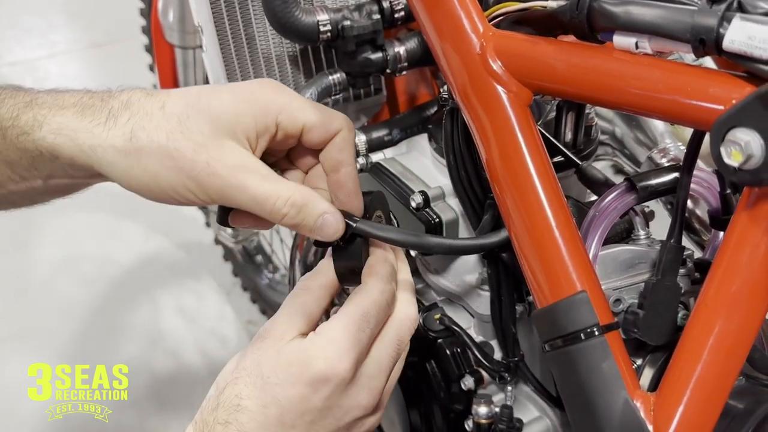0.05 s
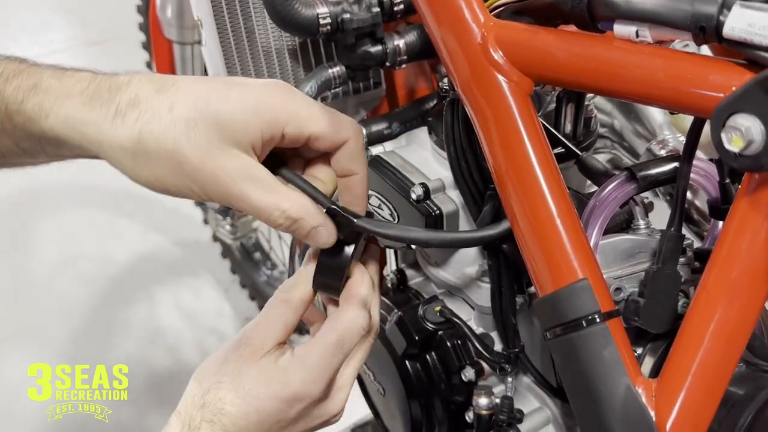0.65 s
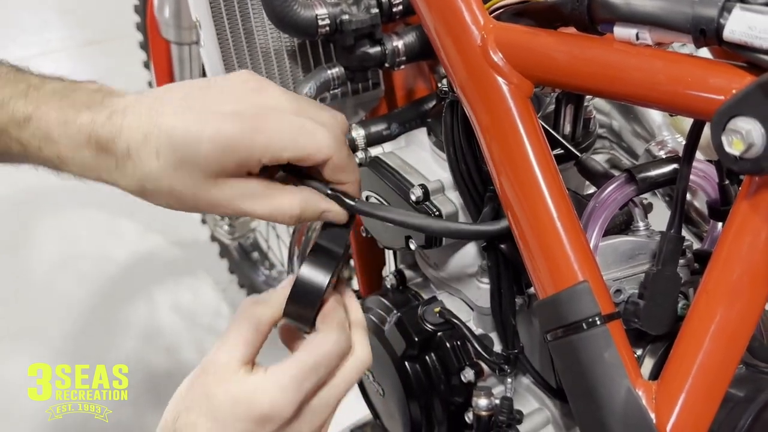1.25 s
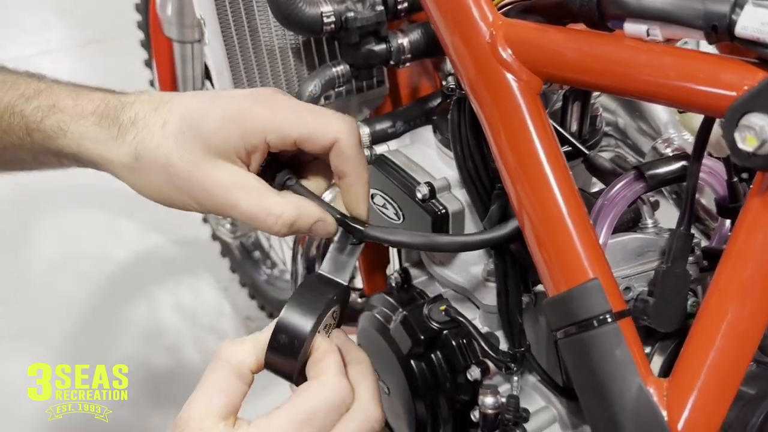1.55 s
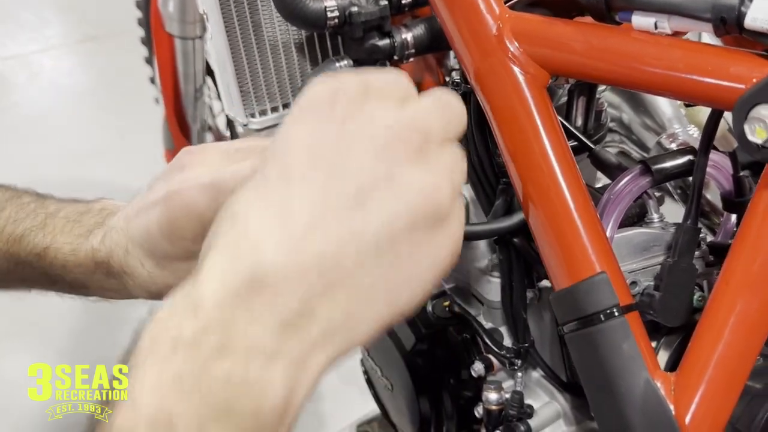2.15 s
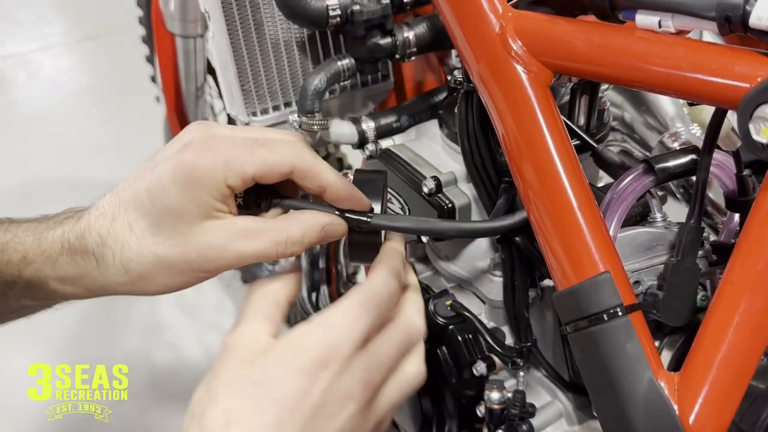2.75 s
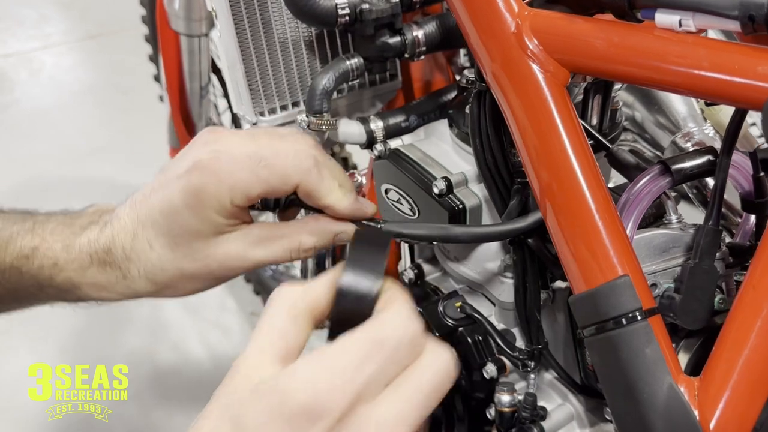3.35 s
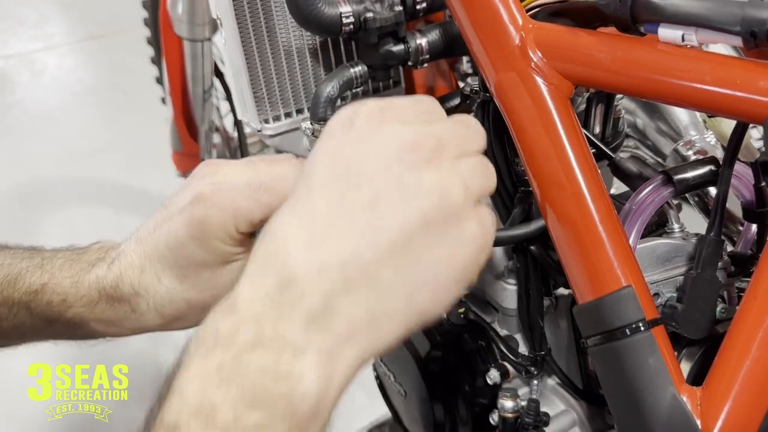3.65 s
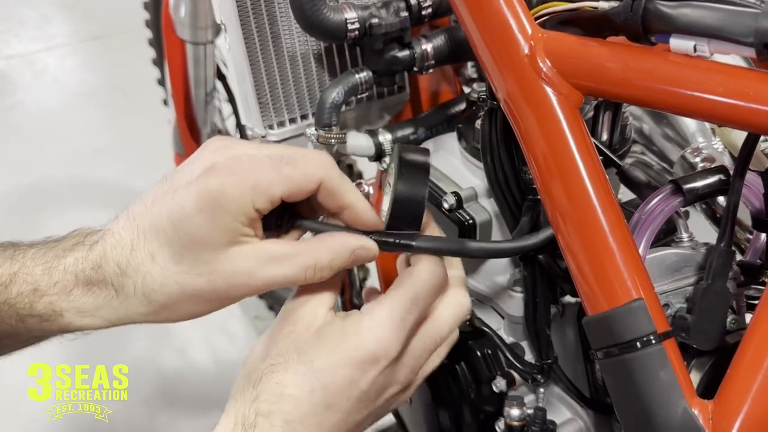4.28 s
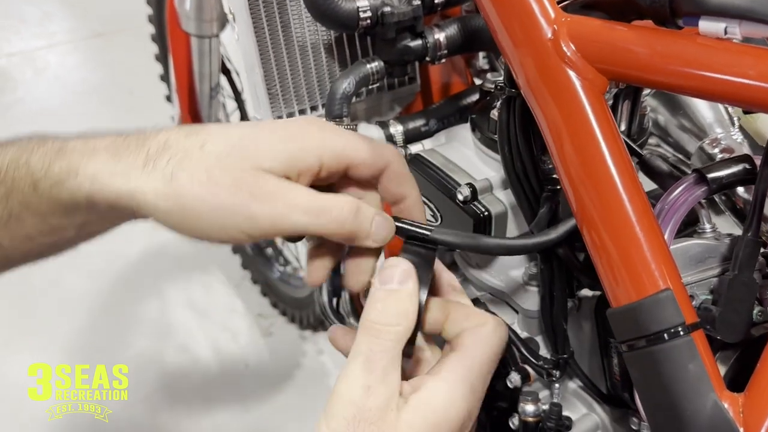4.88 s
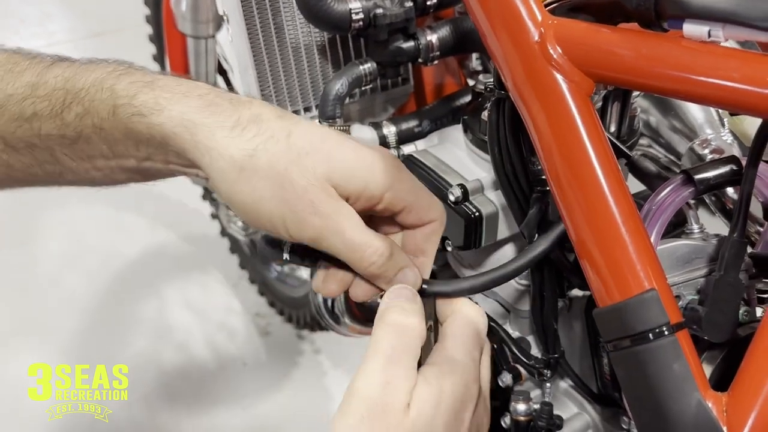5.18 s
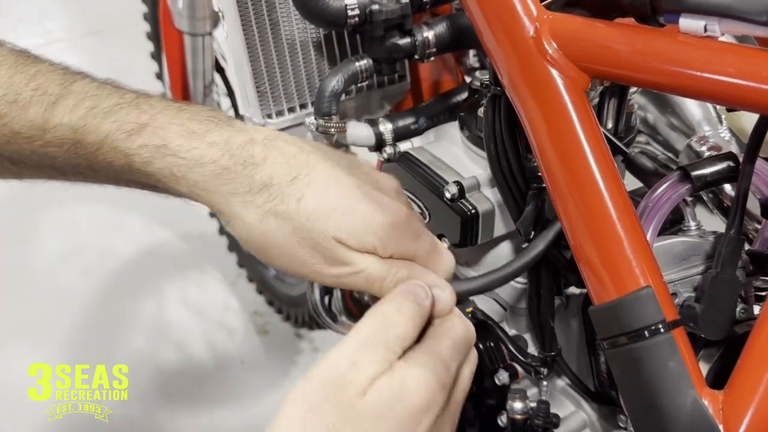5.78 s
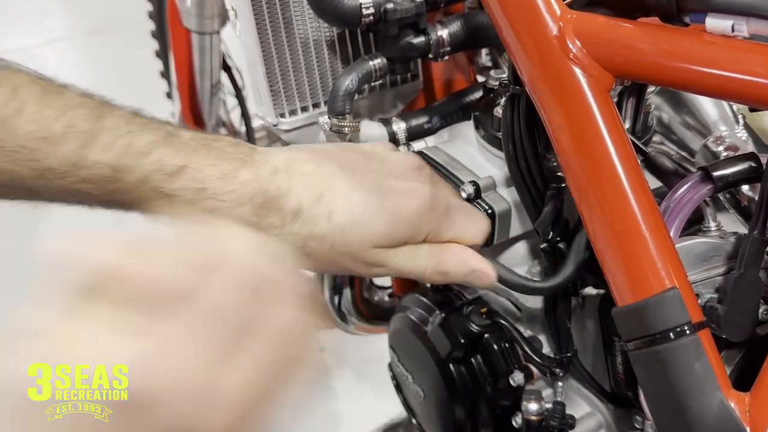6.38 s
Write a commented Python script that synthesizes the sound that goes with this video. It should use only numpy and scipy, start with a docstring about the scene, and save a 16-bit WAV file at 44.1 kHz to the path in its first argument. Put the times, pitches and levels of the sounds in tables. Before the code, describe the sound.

A quiet workshop is heard throughout, with faint low rumble, ventilation and a hum that slowly grows. Close to the microphone, vinyl electrical tape is wound by hand around a cable. It peels off the roll in short, soft rasps around 0.5 seconds, most clearly at 1.3, and again between 3.5 and 4.1 seconds. Small sticky ticks are scattered irregularly all along, mixed with faint finger rubs and hollow rustles of the roll. Fingers swish lightly over the tape at about 3 and 5.2 seconds. From 5 seconds the tape stretches with little runs of ticks. At about 6.3 seconds it nicks, then tears at 6.4 with one sharp crack, by far the loudest sound. A short room echo and a faint metallic ring from the motorcycle follow, with one last small click near 6.6 seconds.

```python
"""Taping a motorcycle cable

A quiet workshop, one microphone close to the hands. Vinyl electrical tape peels off its roll
with a soft hiss and sticky ticks as it is wound round a cable, and fingers rub and slide over it.
At the end it is pulled taut, nicks, and tears with one sharp crack that leaves the bike ringing.
Behind it all lie the building's rumble, the ventilation and a slowly growing hum."""
import sys
import numpy as np
from scipy import signal
from scipy.fft import rfft, irfft, next_fast_len
from scipy.io import wavfile
from scipy.ndimage import map_coordinates

SR = 44100
rng = np.random.default_rng(int(sys.argv[2]) if len(sys.argv) > 2 else 0)


def wav_out(sig):
    """Save sig, one row per channel (or a flat mono array), as 16-bit PCM at SR to the path in sys.argv[1]."""
    wavfile.write(sys.argv[1], SR, np.round(np.clip(np.atleast_2d(sig).T, -1, 1) * 32767).astype(np.int16))


N = 292383

# The hollow body of the roll, knocked or rustled. Each row: frequency in Hz, level in dB.
ROLL_COLOUR = [(100, -27.5), (300, 1), (500, -2), (800, -3.5), (1000, -11.5), (1150, 2), (1400, -15),
               (3000, -24.5)]


def amp(db):
    """Decibels to gain."""
    return 10 ** (np.asarray(db) / 20)


def unit(x):
    """Scale to rms 1."""
    return x / np.sqrt(np.mean(x ** 2) + 1e-20)


def unit_burst(x):
    """Scale a burst to the energy of 10 ms at rms 1."""
    return x * np.sqrt(SR / 100 / np.sum(x ** 2))


def along(points, hz):
    """Read (Hz, value) points on a log frequency axis."""
    point_hz, values = np.transpose(points)
    return np.interp(np.log(hz + 1), np.log(point_hz + 1), values)


def wobble(rate):
    """A smooth random curve, rate knots a second."""
    knots = rng.standard_normal(int(N * rate / SR) + 4)
    return map_coordinates(knots, [np.arange(N) * rate / SR])


def swell(t, length):
    """One smooth rise and fall around t = 0."""
    return np.exp(-(2 * t / length) ** 2)


def add(track, s, x):
    """Mix x into the track at s seconds."""
    start = round(s * SR)
    x = x[max(-start, 0):]
    part = track[max(start, 0):][:len(x)]
    part += x[:len(part)]


def coloured(x, colour, size=4096):
    """Pass x through a minimum-phase filter with the given (Hz, dB) shape."""
    gain = amp(along(colour, np.fft.rfftfreq(size, 1 / SR)))
    cepstrum = irfft(np.log(gain))
    kernel = irfft(np.exp(rfft(2 * cepstrum[:size // 2], size) - cepstrum[0]))
    return signal.fftconvolve(x, kernel)[:len(x)]


def dying_noise(decay, t60_scale=1, size=16384):
    """Noise in which each frequency dies at its own speed."""
    hz, t, spectra = signal.stft(rng.standard_normal(size), SR, nperseg=128)
    t60 = t60_scale * along(decay, hz)[:, None]
    return signal.istft(spectra * amp(-60 * t / t60), SR)[1]


def burst(colour, t60, edge=0.89, size=4096):
    """A sharp release followed by a short crinkle."""
    t = np.arange(size) / SR
    crinkle = rng.standard_normal(size) * amp(-60 * t / t60)
    release = 1 + edge * np.exp(-t / 0.00026)
    return unit_burst(coloured(crinkle * release, colour))


def crackle(colour, rate, spread_db, hiss, size=N):
    """Tiny random releases, rate a second, over a smooth friction hiss."""
    grains = (rng.random(size) < rate / SR) * rng.standard_normal(size)
    grains *= amp(spread_db * rng.standard_normal(size))
    return unit(coloured(unit(grains) + hiss * rng.standard_normal(size), colour))


def ring(modes, attack_s):
    """Damped modes that swell over the attack time; neighbours swing in opposite senses."""
    t = np.arange(SR // 2) / SR
    swings = [(-1) ** k * amp(db - 60 * t / t60) * np.sin(2 * np.pi * hz * t)
              for k, (hz, db, t60) in enumerate(modes)]
    return sum(swings) * (1 - np.exp(-t / attack_s))


def peeling(rise_share=0.42, edge_drop_db=8.5):
    """Glue threads let go in a fine, fluttering rasp as each pull speeds up and eases off."""
    # Tape drawn off the roll. Each row: peak time in seconds, length in seconds, level in dB.
    pulls = [(0.375, 0.18, -68.5), (0.59, 0.33, -69), (1.347, 0.18, -54.5), (1.478, 0.27, -64.5),
             (2.138, 0.075, -63.5), (3.548, 0.073, -58.5), (3.715, 0.11, -61), (4.106, 0.11, -65),
             (4.83, 0.22, -71)]
    # The rasp of unrolling. Each row: frequency in Hz, level in dB.
    rasp_colour = [(900, -8.5), (2200, -7.5), (2750, -2), (3300, 3), (3800, 0.5), (4450, -8.5), (5000, -2),
                   (5550, -7), (6150, 4), (6750, -5), (7350, 1), (9000, -11.5), (10100, -9.5), (12000, -19),
                   (16000, -30)]
    t = np.arange(N) / SR
    pull = np.zeros(N)
    for peak, length, db in pulls:
        from_peak = np.maximum((peak - t) / rise_share, (t - peak) / (1 - rise_share)) / length
        pull += amp(db - edge_drop_db * from_peak)
    flutter = amp(0.45 * wobble(39.55))
    return pull * flutter * crackle(rasp_colour, rate=4400, spread_db=4.5, hiss=1.07)


def tick(s, film_share, winding_hz=7310, stretch_from_s=5.23, sag_hz_per_s=780):
    """A patch of glue pops free and the film flexes; broad creases and stretched tape sound lower."""
    # Glue popping and film flexing. Each row: multiple of the tick's pitch, level in dB.
    glue_colour = [(.25, -49), (.48, -7), (.7, -9), (.88, -4.5), (1.02, 2.5), (1.2, -7), (1.6, -14),
                   (2.3, -33)]
    film_colour = [(.1, -29), (.22, -5), (.29, -6), (.36, -7), (.43, -6), (.52, -9.5), (.68, -13),
                   (1.1, -34)]
    hz = winding_hz - sag_hz_per_s * max(s - stretch_from_s, 0)
    hz *= 1 - 0.2 * film_share ** 2  # a crease lies up to 20% under a pure pop
    hz *= 1 + 0.012 * rng.standard_normal()
    pop = burst([(ratio * hz, db) for ratio, db in glue_colour], t60=0.016)
    film = burst([(ratio * hz, db) for ratio, db in film_colour], t60=0.027)
    return np.sqrt(film_share) * film + np.sqrt(1 - film_share) * pop


def sticky_ticks(average_knock_db=-61):
    """Each clear tick also knocks the roll softly, louder ticks a little harder."""
    # Each row: start in seconds, level in dB, film share from 0 (glue pop) to 1 (film crease).
    ticks = [(0.3447, -53.5, 0.23), (0.8696, -58, 0.7), (0.88, -48, 0.9), (0.908, -60, 0.16),
             (1.313, -54.5, 0.14), (1.401, -61, .08), (1.976, -62, 0.4), (2.061, -58.5, 0),
             (2.357, -62.5, 0.1), (2.391, -62, 0.1), (2.629, -56, 0.5), (2.677, -51.5, 0.03),
             (2.887, -58.5, .9), (3.0906, -47.5, 0.17), (3.138, -60, 0.05), (3.436, -57, 0.14),
             (3.46, -56, .06), (3.5577, -54, 0), (3.66, -45, 0.02), (3.989, -55, 0.02),
             (4.198, -50.5, 0.02), (4.3398, -47.5, .03), (4.4064, -53, 0.02), (4.467, -55, .05),
             (4.787, -48, 0.01), (5.1845, -56, 0.4), (5.258, -53.5, 0.2), (5.371, -46.5, 0.63),
             (5.424, -48.5, 0.27), (5.5767, -49.5, 0.48), (5.6163, -49.5, 0.4), (6.049, -55, 0.72),
             (6.1006, -52, 0.42), (6.5917, -38, 0)]
    out = np.zeros(N)
    average_db = np.mean([db for _, db, _ in ticks])
    for s, db, film_share in ticks:
        knock = amp(average_knock_db + 0.5 * (db - average_db)) * burst(ROLL_COLOUR, t60=0.042)
        add(out, s, amp(db) * tick(s, film_share) + knock)
    return out


def straining(ticks_per_s=32, spread_db=1.5):
    """Strained glue gives way in small, unevenly spaced steps."""
    # Runs of faint ticks. Each row: start in seconds, length in seconds, level in dB.
    strains = [(0.999, 0.15, -66.5), (2.309, .18, -65), (5.152, .22, -61.5), (5.591, .14, -63.5),
               (6.018, .28, -66)]
    out = np.zeros(N)
    for start, length, db in strains:
        for step in range(round(length * ticks_per_s)):
            s = start + (step + rng.random()) / ticks_per_s
            add(out, s, amp(db + spread_db * rng.standard_normal()) * tick(s, film_share=0.5))
    return out


def tear():
    """The taut tape nicks, the roll bumps, the tape parts; the recoil jolts the roll and rings the bike."""
    # Nick, bump and crack. Each row: start in seconds, level in dB, t60 scale, echo level in dB.
    stages = [(6.3424, -23.5, 1, -38.5), (6.3995, -33, 1, -41.5), (6.437, -14, 0.78, -28.5)]
    # Their colours, and that of the crack's echo. Each row: frequency in Hz, level in dB.
    nick = [(40, -12), (80, 0), (120, -5), (180, -13), (320, 1.5), (600, -14.5), (850, -3.5), (1580, -10),
            (2410, 1.5), (3100, -1.5), (4800, -1), (7000, 0), (10000, -3), (16000, -20)]
    bump = [(150, -27), (400, 3.5), (650, 6), (1150, -3), (1600, -14), (5000, -42)]
    crack = [(80, -29), (250, -24), (390, -12.5), (800, -8), (1220, -4.5), (1600, -8), (2200, -3),
             (2900, -4.5), (4900, -7), (6900, -18), (8050, -8.5), (9000, -16), (12300, -18.5), (16000, -37)]
    crack_echo = [(100, -21), (400, 2), (900, 6), (1250, 2.5), (1650, -2), (2200, 1.5), (3200, -1.5),
                  (5000, -7), (8000, -14.5), (15000, -26)]
    # How fast a snap dies. Each row: frequency in Hz, t60 in seconds before scaling.
    damping = [(120, 0.17), (500, 0.079), (1200, 0.032), (3000, 0.03), (8000, 0.023), (15000, 0.015)]
    # Roll with cable, and the bike's metal. Each row: frequency in Hz, level in dB, t60 in seconds.
    roll_modes = [(406, -24, 0.092), (657, -27.5, 0.071), (778, -24.5, 0.098), (996, -20, 0.066),
                  (1182, -9, 0.029), (1280, -10.5, 0.039), (2190, -19, 0.032), (2606, -16.5, 0.047),
                  (2750, -13, 0.022), (3010, -20, 0.059), (4400, -32, 0.043), (5960, -17.5, 0.023),
                  (8000, -26, 0.022)]
    metal_modes = [(241.7, -49.5, 1), (413, -44.5, 0.78), (551, -33.5, 0.55), (592, -31.5, 0.55),
                   (633, -45, .55)]
    out = np.zeros(N)
    direct, returned = (nick, bump, crack), (nick, bump, crack_echo)
    for (s, db, t60_scale, echo_db), colour, echo_colour in zip(stages, direct, returned):
        snap = coloured(dying_noise(damping, t60_scale), colour)
        add(out, s, amp(db) * unit_burst(snap))
        add(out, s, amp(echo_db) * unit_burst(echo(echo_colour)))
    parting_s = stages[-1][0]
    add(out, parting_s, ring(roll_modes, attack_s=0.0012) + ring(metal_modes, attack_s=0.0073))
    return out


def finger_slides(catch_db=3):
    """Skin on vinyl: a catching swish whose pitch follows the finger."""
    # Each row: start and length in seconds, first and last pitch in Hz, half-width in Hz, level in dB.
    slides = [(2.914, 0.058, 4220, 6400, 800, -64.5), (3.14, 0.2, 6200, 2390, 452, -63.5),
              (5.071, 0.16, 8070, 7700, 700, -64.5), (5.211, 0.18, 6600, 6400, 260, -55)]
    out = np.zeros(N)
    for s, length, start_hz, end_hz, half_width_hz, db in slides:
        n = int(length * SR)
        phase = 2 * np.pi * np.cumsum(np.geomspace(start_hz, end_hz, n)) / SR
        lowpass = signal.butter(2, half_width_hz, fs=SR, output="sos")
        noise = signal.sosfilt(lowpass, rng.standard_normal((2, SR // 2)))[:, :n]
        gliding_band = noise[0] * np.sin(phase) + noise[1] * np.cos(phase)
        swish = unit(gliding_band * amp(catch_db * wobble(65)[:n]))
        add(out, s, amp(db) * swish * np.sin(np.linspace(0, np.pi, n)))
    return out


def rub(octaves, hollow_db=3, bands=40):
    """One second of rubbing hiss, shifted in pitch; cupped hands form new resonances every time."""
    # Skin rubbing on tape. Each row: frequency in Hz before the shift, level in dB.
    rub_colour = [(1000, -18), (2000, -13.5), (3400, -0.5), (4500, -2.5), (6200, 1.5), (7600, 3),
                  (9000, -2), (12000, -8.5), (16000, -20)]
    hz = np.geomspace(1000, 16000, bands)
    shape_db = along(rub_colour, hz / 2 ** octaves) + hollow_db * rng.standard_normal(bands)
    return crackle(np.column_stack([hz, shape_db]), rate=3000, spread_db=6, hiss=1.16, size=SR)


def rubbing(plain_stroke_db=-67.5, octaves_per_db=0.03):
    """Each stroke swells and fades, brighter when brisker; a grip is a dull rub that rustles the roll."""
    # Smoothing the tape and regripping the roll. Each row: middle and length in seconds, level in dB.
    strokes = [(0.928, .17, -66.5), (2.449, 0.067, -67), (2.67, .09, -66.5), (3.05, 0.14, -66),
               (3.241, 0.25, -65.5), (3.412, 0.11, -68), (3.84, 0.067, -61.5), (4.601, 0.21, -61.5),
               (5.311, 0.14, -59.5), (5.741, 0.07, -68), (5.95, 0.11, -67.5)]
    grips = [(0.37, 0.055, -62), (1.056, .18, -66.5), (1.34, 0.081, -65), (2.053, 0.029, -56.5),
             (2.356, 0.034, -68), (3.111, 0.051, -65), (4.488, 0.033, -60), (5.637, 0.057, -59.5),
             (5.9, 0.15, -64)]
    out = np.zeros(N)
    t = np.arange(SR) / SR - 0.5
    for middle, length, db in strokes:
        skin = rub(octaves=octaves_per_db * (db - plain_stroke_db))
        add(out, middle - 0.5, amp(db) * swell(t, length) * skin)
    for middle, length, db in grips:
        rustle = crackle(ROLL_COLOUR, rate=450, spread_db=2, hiss=2.1, size=SR)
        skin = amp(-7) * rub(octaves=-0.68)
        add(out, middle - 0.5, amp(db) * swell(t, length) * (rustle + skin))
    return out * amp(2.5 * wobble(45))


def echo(colour, build_s=0.0023):
    """The workshop's diffuse answer to a snap builds up, then dies away."""
    # The room's decay. Each row: frequency in Hz, t60 in seconds.
    room_decay = [(150, 0.6), (600, 0.6), (2500, 0.57), (6000, 0.5), (10000, 0.27), (16000, 0.1)]
    tail = coloured(dying_noise(room_decay), colour)
    t = np.arange(len(tail)) / SR
    return tail * (1 - np.exp(-t / build_s))


def room(x, wet_db):
    """The small sounds as the walls return them."""
    # The colour of the reflections. Each row: frequency in Hz, level in dB.
    wall_colour = [(100, -1), (600, 5.5), (1300, -1.5), (2500, -6.5), (6000, -10.5), (15000, 2)]
    tail = echo(wall_colour)
    return amp(wet_db) * signal.fftconvolve(x, tail / np.linalg.norm(tail))[:N]


def background(hum_hz=92.6, whine_hz=1529, whine_db=-82, rumble_db=-64):
    """Room tone: building rumble and ventilation, with a wavering hum and a faint whine."""
    # The rising room tone. Each row: time in seconds, ventilation level in dB, hum level in dB.
    levels = [(0, -67, -84), (3.0, -65.5, -74), (5.0, -62, -65), (6.3, -61.5, -60.5)]
    # The building and its ventilation. Each row: frequency in Hz, level in dB.
    rumble_colour = [(15, -24), (28, -17.5), (78, -1), (110, -5.5), (145, 1), (220, -15), (600, -38.5)]
    air_colour = [(60, -18.5), (200, -9.5), (320, -7.5), (600, -14), (900, -15.5), (1480, -15.5),
                  (1750, -24.5), (3000, -26), (7500, -28.5), (12000, -39), (16000, -49.5)]
    t = np.arange(N) / SR
    times, *columns = np.transpose(levels)
    air_db, hum_db = [np.interp(t, times, column) for column in columns]
    rumble = amp(rumble_db) * unit(coloured(rng.standard_normal(N), rumble_colour))
    air = amp(air_db + 1.7 * wobble(3.93)) * unit(coloured(rng.standard_normal(N), air_colour))
    hum = amp(hum_db + wobble(7.2)) * unit(np.sin(2 * np.pi * hum_hz * t + 0.5 * wobble(6.3)))
    whine = amp(whine_db) * unit(np.sin(2 * np.pi * whine_hz * t + 0.5 * wobble(2.4)))
    return rumble + air + hum + whine


def scene():
    """Close handling and the tear over the workshop's room tone, in mono."""
    hands = peeling() + rubbing() + finger_slides() + sticky_ticks() + straining()
    return (hands + room(hands, wet_db=-14.5) + tear() + background())[None]


def record(dry):
    """The microphone rounds off the highest peak and keeps nothing above its band limit."""
    ceiling, top_hz = 0.8, 16300
    rounded = dry / (1 + np.abs(dry / ceiling) ** 6) ** (1 / 6)
    size = next_fast_len(N + SR // 2)
    in_band = np.fft.rfftfreq(size, 1 / SR) < top_hz
    return irfft(rfft(rounded, size) * in_band, size)[:, :N]


dry = scene()
out = record(dry)
wav_out(out)
```